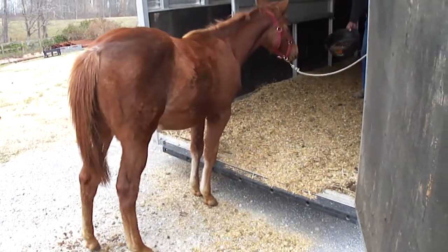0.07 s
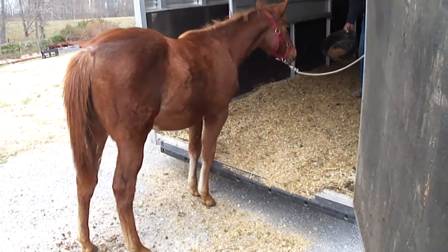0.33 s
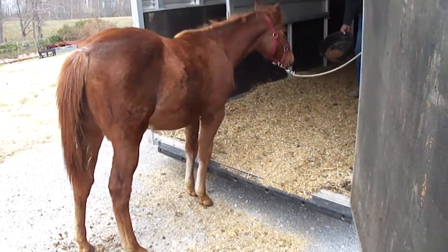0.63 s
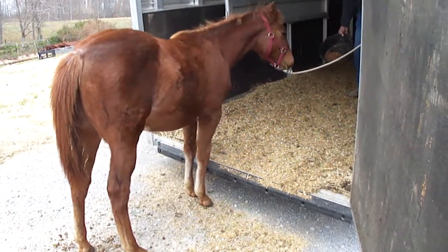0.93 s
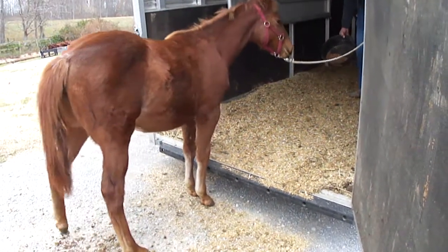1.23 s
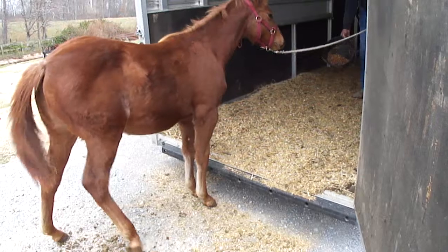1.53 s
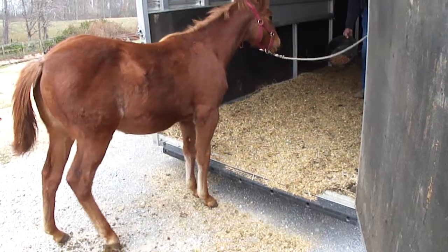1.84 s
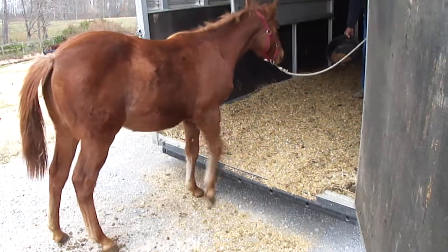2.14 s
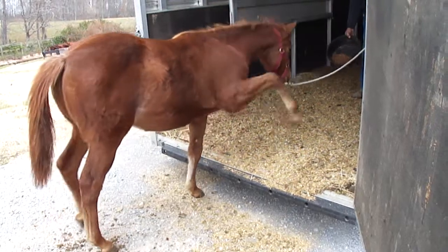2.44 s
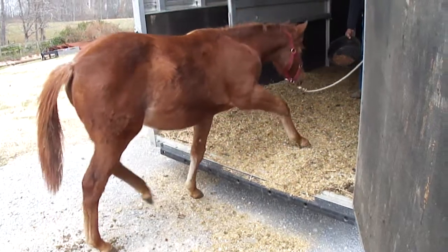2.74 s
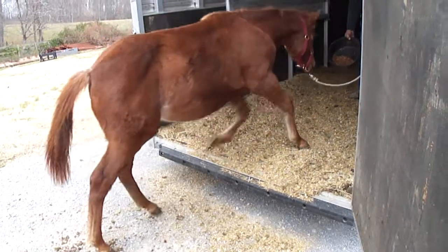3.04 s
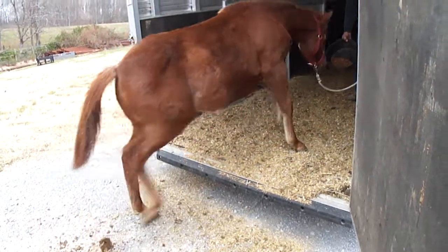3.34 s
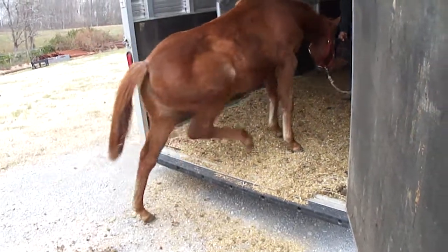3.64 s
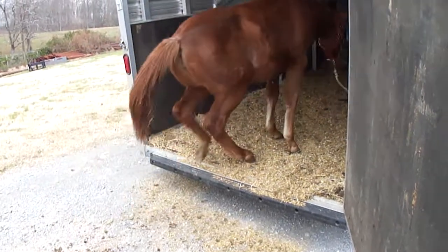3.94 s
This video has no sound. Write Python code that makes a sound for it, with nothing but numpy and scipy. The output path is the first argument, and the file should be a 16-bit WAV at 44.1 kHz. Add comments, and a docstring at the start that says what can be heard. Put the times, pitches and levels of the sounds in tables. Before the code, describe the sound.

A horse scuffs on gravel, then its hooves thump loudly onto a metal trailer's floor.

```python
"""Horse stepping into a stock trailer

Outdoors in quiet air, a few metres from the microphone, a horse shifts its feet on gravel; stones click
and scuff under it. Then it steps up into the trailer. Each hoof knocks, booms in the floor and crunches
the wood shavings, and the metal box rings on."""
import sys
import numpy as np
from scipy import signal
from scipy.fft import rfft, irfft
from scipy.io import wavfile

SR = 44100
rng = np.random.default_rng(int(sys.argv[2]) if len(sys.argv) > 2 else 0)


def transcribe(u):
    """Save the signal u as a 16-bit wav file named by the first command-line argument.

    u: samples, shape (n,) or (channels, n), limited to [-1, 1]; the rate is SR.
    q: integer samples, one column per channel.
    """
    v = np.clip(np.atleast_2d(u).T, -1, 1)
    q = np.round(v * 32767).astype(np.int16)
    wavfile.write(sys.argv[1], SR, q)


N = 4 * SR
STONE_RISE_S = 0.00054


def undb(db):
    """Decibels to gain."""
    return 10 ** (np.asarray(db) / 20)


def unit(x):
    """Scale to rms 1."""
    return x / np.sqrt(np.mean(x ** 2) + 1e-20)


def band(x, lo_hz, hi_hz, order=2):
    """Band-pass, scaled to rms 1."""
    sos = signal.butter(order, [lo_hz, hi_hz], "band", fs=SR, output="sos")
    return unit(signal.sosfilt(sos, x))


def colour(x, points):
    """Filter x by a curve of (freq_hz, gain_db) points, scaled to rms 1."""
    hz, db = np.array(points).T
    bins_hz = np.maximum(np.fft.rfftfreq(len(x), 1 / SR), 1)
    gain = undb(np.interp(np.log(bins_hz), np.log(hz), db))
    return unit(irfft(rfft(x) * gain, len(x)))


def add(out, start_s, x):
    """Mix x into out from start_s on."""
    i = int(start_s * SR)
    part = x[:max(N - i, 0)]
    out[i:i + len(part)] += part


def grains(per_s, spread_db):
    """A stream of tiny clicks, a few much larger than the rest."""
    size = undb(spread_db * np.minimum(rng.standard_exponential(N), 4))
    return (rng.random(N) < per_s / SR) * rng.choice([-1, 1], N) * size


def swell(peak_s, rise_s, decay_s):
    """An envelope that builds to a peak, then lets go, like the pressure of a hoof."""
    t = np.arange(N) / SR - peak_s
    return np.exp(-np.where(t < 0, (t / rise_s) ** 2, t / decay_s))


def strike(t, rise_s, decay_s):
    """The envelope of an impact: a quick rise and an exponential decay."""
    return (1 - np.exp(-t / rise_s)) * np.exp(-t / decay_s)


def wander(t, per_s):
    """Random values joined by straight lines."""
    return np.interp(t * per_s, np.arange(400), rng.standard_normal(400))


def air():
    """Steady open-air hiss over a low rumble that comes and goes."""
    # spectrum of the hiss: freq_hz, gain_db
    hiss_curve = [(18, -47), (30, -23), (232, 1), (450, 0.5), (876, -1), (5420, -12), (6930, -16),
                  (10800, -18.5), (12000, -74)]
    drift = np.interp(np.arange(N), np.linspace(0, N, 40), rng.standard_normal(40))
    rumble = band(rng.standard_normal(N), 58, 235) * undb(3.2 * drift)
    hiss = colour(rng.standard_normal(N), hiss_curve)
    return undb(-50.5) * hiss + undb(-64) * rumble


def chirps():
    """Faint high chirps, probably birds far from the microphone."""
    # calls: peak_s, pitch_hz, level_db
    calls = [(.462, 5260, -52), (.522, 7760, -62)]
    out = np.zeros(N)
    for peak, hz, db in calls:
        whistle = band(rng.standard_normal(N), hz * 0.9, hz * 1.1)
        out += undb(db) * swell(peak, rise_s=0.02, decay_s=0.02) * whistle
    return out


def rumbles():
    """Dull, narrow swells of bass as the horse shifts its weight."""
    # weight shifts: peak_s, level_db, pitch_hz
    shifts = [(.12, -49, 273), (2.289, -50, 206), (3.2, -44, 213)]
    out = np.zeros(N)
    for peak, db, hz in shifts:
        bass = band(rng.standard_normal(N), hz / 1.33, hz * 1.15)
        out += undb(db) * swell(peak, rise_s=0.035, decay_s=0.05) * bass
    return out


def scuffs():
    """Pebbles of many sizes grind under a dragged hoof, each ringing briefly at its own pitch."""
    # drags through the gravel: peak_s, rise_s, decay_s, level_db, pitch_hz
    drags = [(.03, 0.015, 0.03, -48, 1510), (.105, 0.018, 0.049, -44.5, 740),
             (.27, 0.035, 0.024, -50, 1670), (.745, 0.023, 0.015, -49.5, 1200),
             (1.03, 0.011, 0.011, -47.5, 1790), (1.218, 0.0064, 0.015, -47, 1690),
             (1.385, 0.077, 0.023, -52.5, 3500), (1.472, 0.051, 0.046, -44, 816),
             (1.476, 0.051, 0.017, -43, 2160), (1.58, 0.051, 0.056, -47, 2620),
             (1.936, 0.018, 0.02, -46.5, 5000), (2.176, 0.032, 0.091, -44.5, 1930),
             (3.104, 0.017, 0.055, -43, 1620), (3.24, 0.054, 0.37, -48.5, 1740)]
    edge_ratio = 1.068  # narrow bands, so each pebble rings for a few cycles
    grit = np.zeros(N)
    for hz in np.geomspace(250, 10000, 20):
        clicks = grains(per_s=260, spread_db=4)
        grit += np.sqrt(hz) * band(clicks, hz / edge_ratio, hz * edge_ratio, order=1)
    return sum(undb(db) * swell(peak, rise, decay) * band(grit, hz * 0.51, hz * 1.35, order=1)
               for peak, rise, decay, db, hz in drags)


def stones():
    """Each stone gives a short crack in three bands, a dull thud in the ground and a faint scatter."""
    # stones struck or pinched by a hoof: start_s, decay_s, low_db, mid_db, high_db
    hits = [(0.081, 0.0028, -42.5, -42.5, -50.5), (0.3, 0.002, -60, -50, -47),
            (0.766, 0.0025, -59, -52.5, -60), (1.13, 0.0068, -45.5, -43, -46),
            (1.141, 0.0039, -64, -46, -50), (1.288, 0.0033, -60, -46.5, -53.5),
            (1.334, 0.0047, -62, -50, -46), (1.36, 0.0032, -41, -47, -47), (1.448, 0.0012, -47, -43, -50),
            (1.543, 0.0037, -44, -45.5, -64), (1.659, 0.0023, -54, -45, -56),
            (1.9169, 0.0028, -44, -32.5, -40), (2.012, 0.02, -48, -61, -56),
            (2.108, 0.0078, -46, -45.5, -58), (2.21, 0.0068, -37, -45, -66), (2.541, 0.0031, -44, -60, -64),
            (2.907, 0.0017, -39.5, -37.5, -42.5), (2.932, 0.0013, -42, -38.5, -46),
            (3.1893, 0.0021, -54, -49.5, -48.5)]
    # low, mid and high bands of the crack: lo_hz, hi_hz
    crack_bands = [(400, 1600), (1600, 5000), (5000, 11000)]
    out, t = np.zeros(N), np.arange(SR // 5) / SR
    trim = undb(-1.5) / np.sqrt(10)
    scatter = undb(-20.5) * np.exp(-t / 0.036)
    for start, decay, *levels_db in hits:
        envelope = (1 - np.exp(-t / STONE_RISE_S)) ** 3 * (np.exp(-t / decay) + scatter)
        thud = ((70, 400), levels_db[0] - 8.5)
        for (lo, hi), db in [*zip(crack_bands, levels_db), thud]:
            burst = unit(band(rng.standard_normal(len(t)), lo, hi) * envelope)
            add(out, start, trim * undb(db) * burst)
    return out


def clacks():
    """Hoof horn or a larger stone rings with one quickly damped resonance."""
    # ringing contacts: start_s, pitch_hz, decay_s, level_db
    hits = [(.778, 1446, 0.018, -43), (1.130, 903, 0.0046, -30.5), (1.131, 1750, 0.0064, -37),
            (1.9183, 4550, 0.0027, -19), (1.360, 532, 0.0044, -26.5), (2.012, 1246, .007, -33.5),
            (2.209, 1196, 0.004, -25), (2.906, 2160, 0.0036, -21)]
    out, t = np.zeros(N), np.arange(SR // 5) / SR
    for start, hz, decay, db in hits:
        add(out, start, undb(db) * strike(t, STONE_RISE_S, decay) * np.sin(2 * np.pi * hz * t))
    return out


def shavings():
    """The bedding crunches as the weight settles: a dull crush and a bright crackle."""
    # hooves pressing on shavings: peak_s, rise_s, decay_s, crush_db, crackle_db
    crunches = [(2.71, 0.029, 0.052, -30.5, -34), (2.775, 0.039, 0.12, -35.5, -69),
                (2.999, 0.0083, 0.0062, -35, -35.5), (3.478, 0.035, 0.048, -33, -41),
                (3.54, 0.025, 0.035, -40.5, -56), (3.828, 0.044, 0.042, -27, -27.5),
                (3.887, 0.095, 0.078, -29.5, -54)]
    # spectra of the crush and the crackle: freq_hz, gain_db
    crush_curve = [(100, -11), (300, 5.5), (700, 2), (1400, -4), (2600, -7.5), (5000, -28), (11000, -55)]
    crackle_curve = [(300, -15), (1500, 8), (3500, 3.5), (6000, -2), (8500, -5), (11000, -18)]
    crush = colour(grains(per_s=7000, spread_db=3.5), crush_curve)
    crackle = colour(grains(per_s=5000, spread_db=3.5), crackle_curve)
    return sum(swell(peak, rise, decay) * (undb(crush_db) * crush + undb(crackle_db) * crackle)
               for peak, rise, decay, crush_db, crackle_db in crunches)


def wall_reflections(x):
    """Close reflections between the trailer walls give a hollow colour."""
    decay_s, wet = 0.017, undb(-6.5)
    t = np.arange(SR // 5) / SR
    echoes = rng.standard_normal(len(t)) * np.exp(-t / decay_s)
    reflected = signal.fftconvolve(x, echoes / np.linalg.norm(echoes))[:N]
    return (x + wet * reflected) / np.hypot(1, wet)


def knocks():
    """A hoof gives a heavily damped knock of a few cycles; softer contacts are lower and longer."""
    # hoof contacts: start_s, pitch_hz, contact_s, level_db
    contacts = [(2.6253, 574, 0.00073, -7.5), (2.6394, 285, 0.0023, -11), (2.6695, 200, 0.0023, -12.5),
                (2.989, 187, 0.0035, -20), (3.030, 171, 0.0041, -27.5), (3.423, 785, 0.00071, -17.5),
                (3.4262, 1430, 0.00088, -21), (3.426, 252, 0.0053, -24.5), (3.431, 102, 0.0042, -27),
                (3.454, 114, 0.0055, -27), (3.476, 80, 0.0047, -24.5), (3.613, 129, 0.0018, -27.5),
                (3.679, 295, 0.0033, -39.5), (3.718, 188, 0.0021, -23), (3.7703, 643, 0.0014, -9.5),
                (3.793, 620, 0.0014, -13.5), (3.806, 248, 0.0011, -19)]
    out, t = np.zeros(N), np.arange(SR // 10) / SR
    for start, hz, contact, db in contacts:
        envelope = (t / contact) ** 2 * np.exp(2 * (1 - t / contact))
        add(out, start, undb(db) * envelope * np.sin(2 * np.pi * hz * t))
    return out


def panel_ring(t, rise_s):
    """The struck panels ring on, wavering in pitch as the shifting load detunes them."""
    # resonances of the floor and walls: pitch_hz, level_db, t60_s
    modes = [(130.5, -1.5, 0.68), (195.4, -8, 1.03), (239, -3.5, 1.06), (269.8, 4, 0.64),
             (354.7, -7.5, 1.28), (568, -9.5, 0.95), (685, -10, 0.31), (718, -11, 0.25), (879, -12, 0.52),
             (1020, -14.5, 1.3), (1184, -14, 0.69), (1846, -16.5, 0.71)]
    ring = np.zeros(len(t))
    for hz, db, t60 in modes:
        detune = 1 + 0.017 * wander(t, per_s=29.9)
        cycles = hz * np.cumsum(detune) / SR + rng.random()
        ring += undb(db - 60 * t / t60) * np.sin(2 * np.pi * cycles)
    return ring * (1 - np.exp(-t / rise_s))


def trailer():
    """A landing hoof cracks on the edge, booms in the floor, rings the panels and shakes the box."""
    # weight landing on the floor: start_s, crack_db, boom_db, boom_low_hz, ring_db, rattle_db
    steps = [(2.625, -9.5, -23.5, 125, -23.5, -29.5), (2.98, -34, -39, 131, -43, -46.5),
             (3.424, -41, -39, 59.3, -39.5, -34), (3.618, -67, -42, 80, -66, -46.5),
             (3.785, -19.5, -29, 85.6, -33, -28.5)]
    # spectra of a hoof on the floor's hard edge and of the loose metal box: freq_hz, gain_db
    crack_curve = [(250, -8), (700, 1), (1400, -3), (2200, -7.5), (4000, -8.5), (6500, -24.5), (11000, -34)]
    rattle_curve = [(45, 1), (150, 4.5), (700, -3), (1500, -6.5), (3000, -10.5), (6000, -17), (11000, -32)]
    boom_top_hz, floor_rise_s = 281, 0.0012
    out, t = np.zeros(N), np.arange(2 * SR) / SR
    for start, crack_db, boom_db, boom_low_hz, ring_db, rattle_db in steps:
        crack = colour(rng.standard_normal(len(t)), crack_curve)
        crack *= undb(crack_db) * strike(t, rise_s=0.0006, decay_s=0.0039)
        boom = band(rng.standard_normal(len(t)), boom_low_hz, boom_top_hz, order=3)
        boom *= undb(boom_db) * strike(t, floor_rise_s, decay_s=0.1)
        ring = undb(ring_db) * panel_ring(t, floor_rise_s)
        rattle = colour(grains(per_s=2500, spread_db=3)[:len(t)], rattle_curve)
        rattle *= undb(rattle_db) * strike(t, rise_s=0.0037, decay_s=0.18)
        add(out, start, crack + boom + ring + rattle)
    return out


def scene():
    """Gravel, trailer and open air at one microphone, a few metres from the horse."""
    on_gravel = stones() + clacks() + scuffs() + rumbles()
    in_trailer = knocks() + trailer() + wall_reflections(shavings())
    return (on_gravel + in_trailer + air() + chirps())[None]


def record(dry):
    """The microphone chain drops the deepest bass and cuts the top steeply."""
    low_cut = signal.butter(4, 46, "high", fs=SR, output="sos")
    high_cut = signal.ellip(12, 0.2, 70, 11050, fs=SR, output="sos")
    return signal.sosfilt(high_cut, signal.sosfilt(low_cut, dry))


dry = scene()
out = record(dry)
transcribe(out)
```